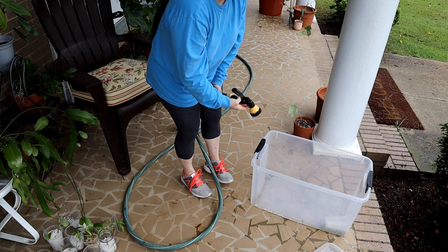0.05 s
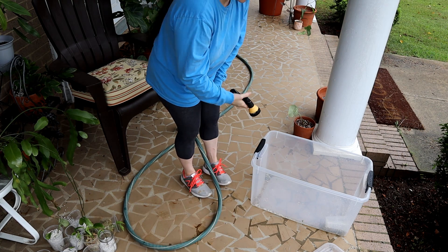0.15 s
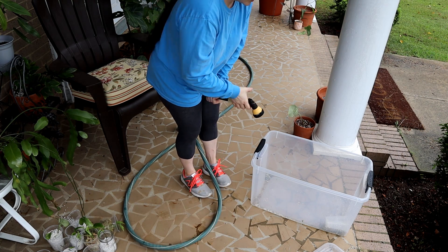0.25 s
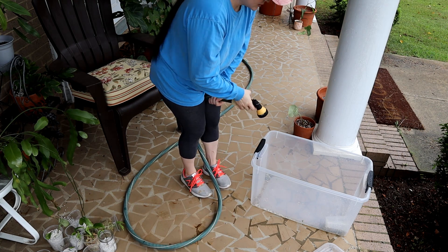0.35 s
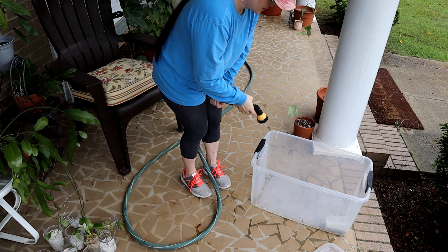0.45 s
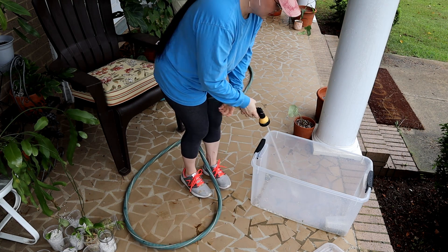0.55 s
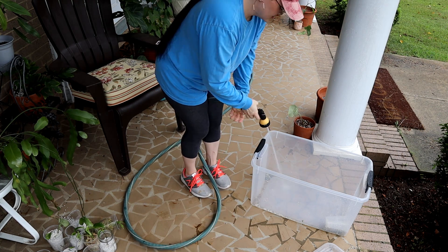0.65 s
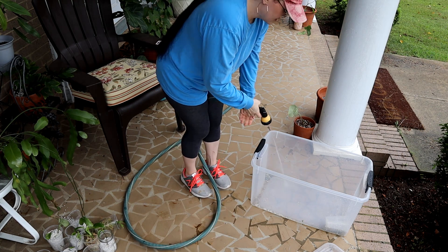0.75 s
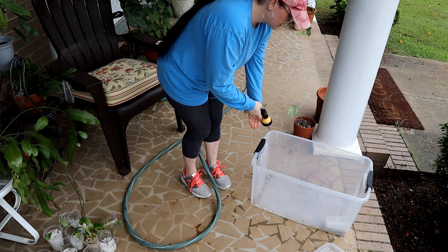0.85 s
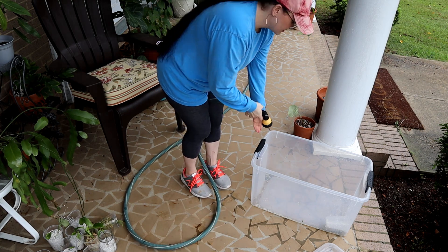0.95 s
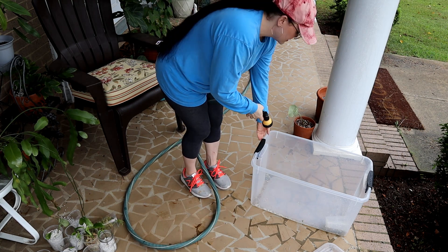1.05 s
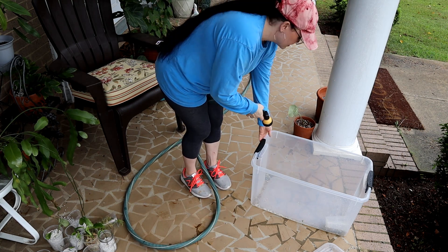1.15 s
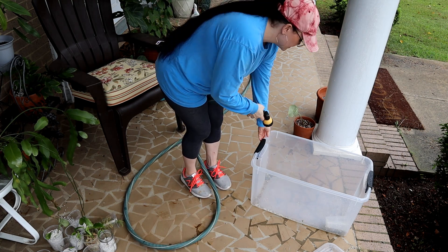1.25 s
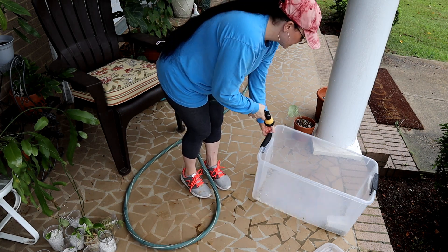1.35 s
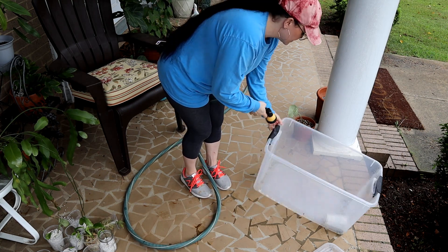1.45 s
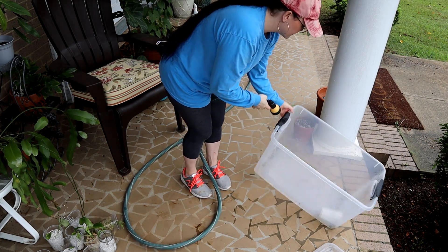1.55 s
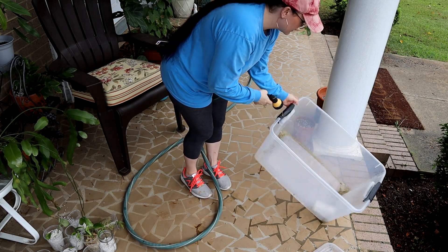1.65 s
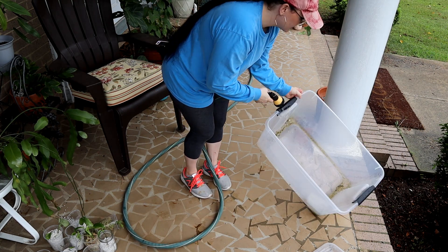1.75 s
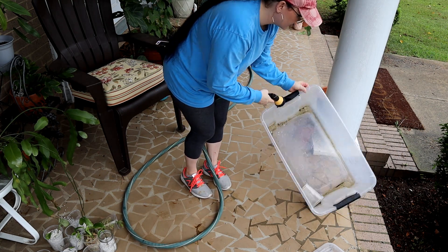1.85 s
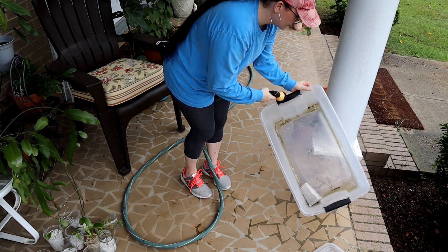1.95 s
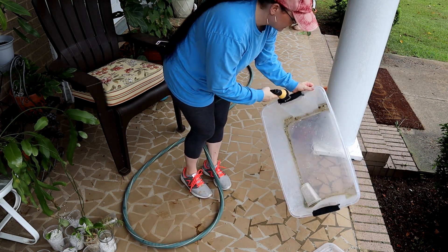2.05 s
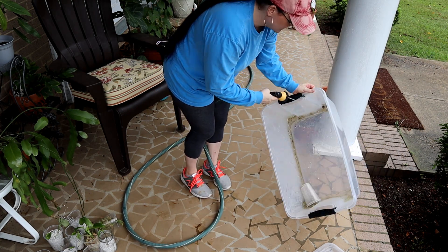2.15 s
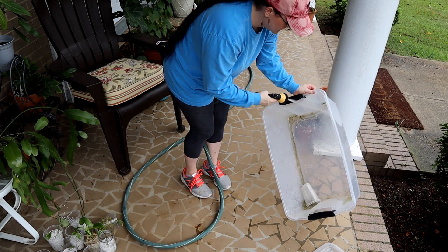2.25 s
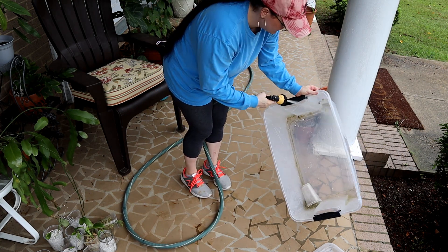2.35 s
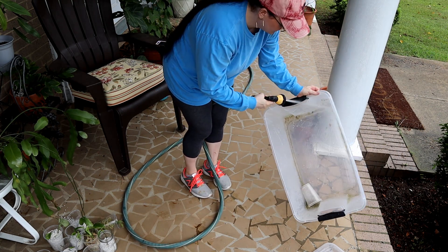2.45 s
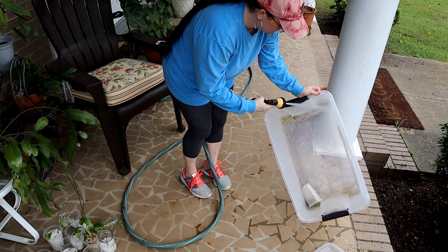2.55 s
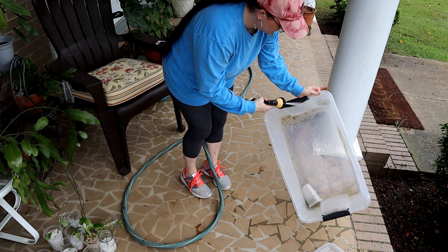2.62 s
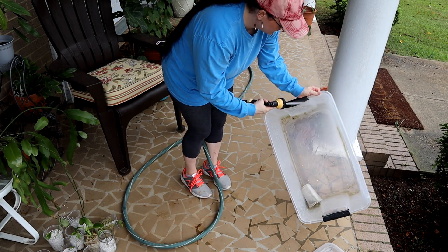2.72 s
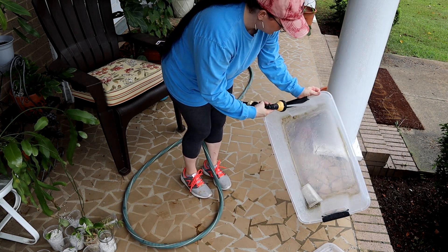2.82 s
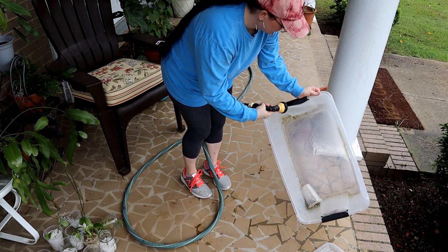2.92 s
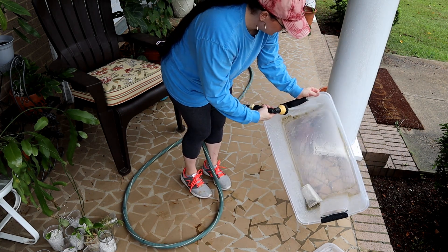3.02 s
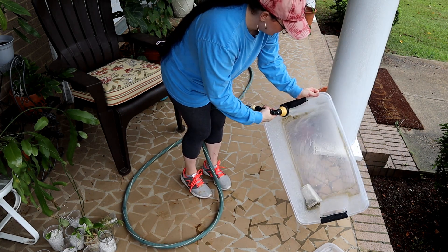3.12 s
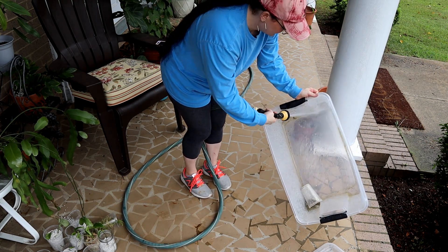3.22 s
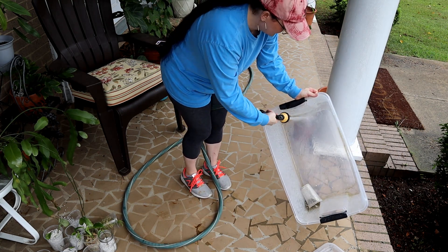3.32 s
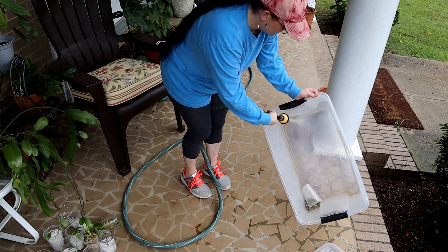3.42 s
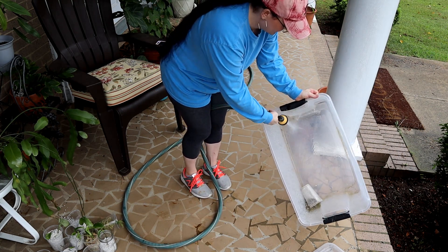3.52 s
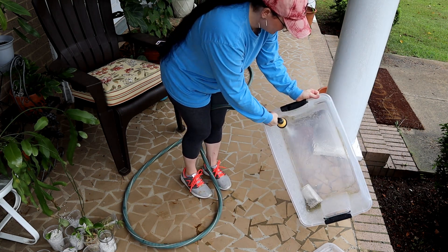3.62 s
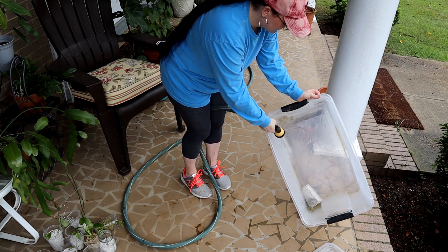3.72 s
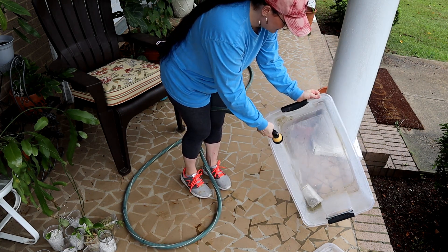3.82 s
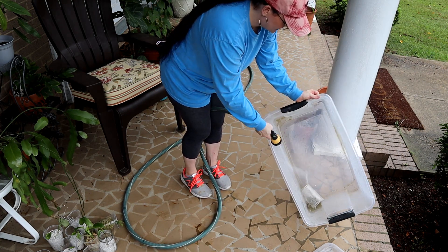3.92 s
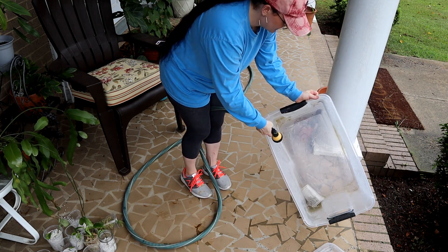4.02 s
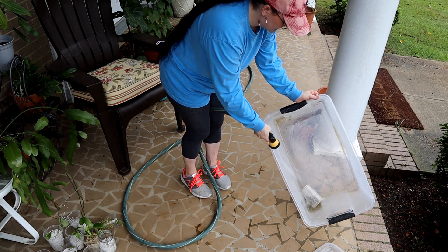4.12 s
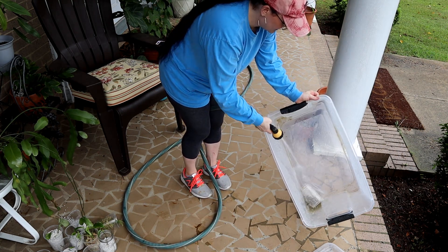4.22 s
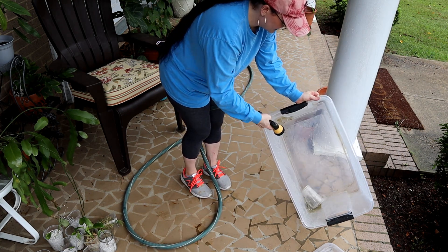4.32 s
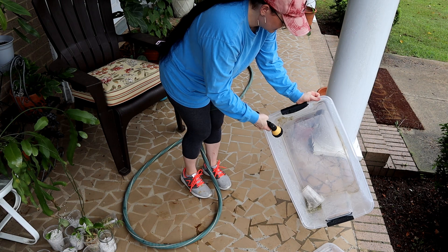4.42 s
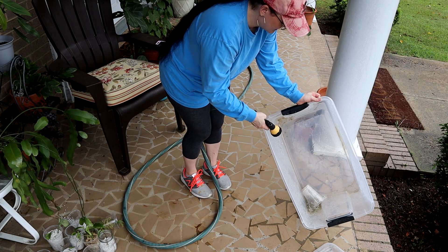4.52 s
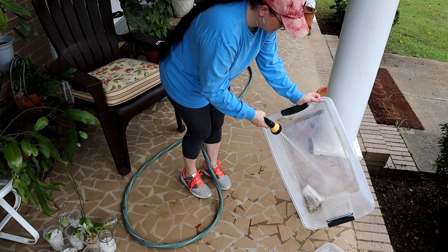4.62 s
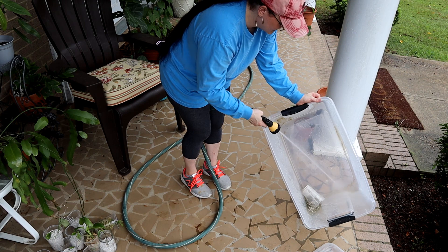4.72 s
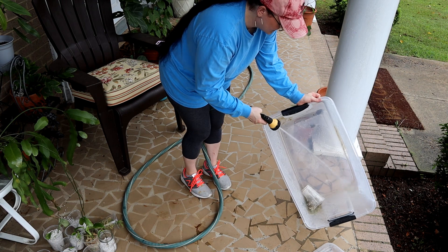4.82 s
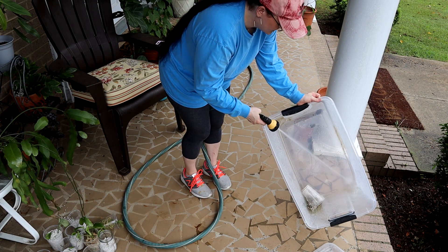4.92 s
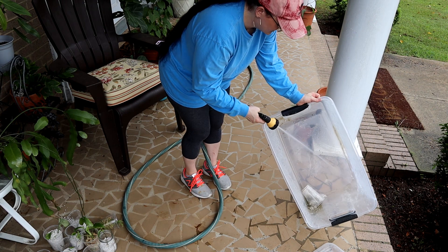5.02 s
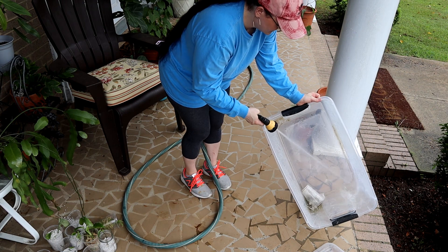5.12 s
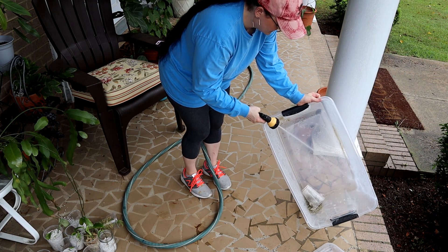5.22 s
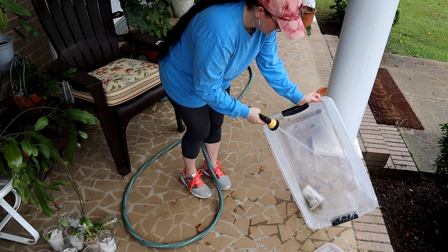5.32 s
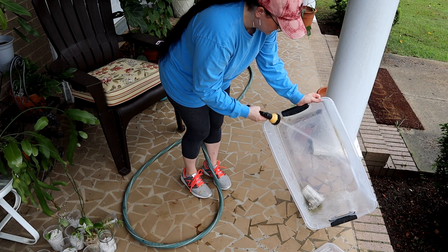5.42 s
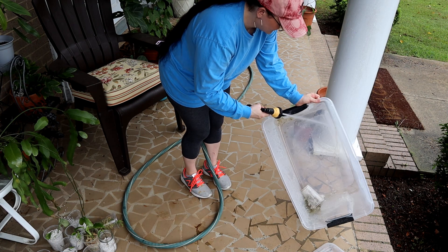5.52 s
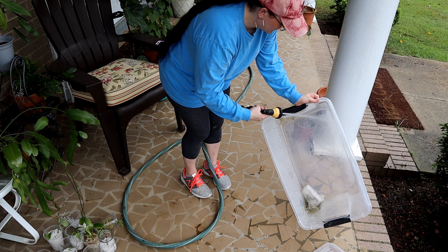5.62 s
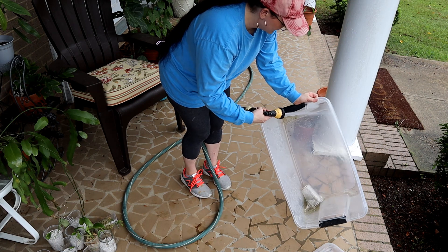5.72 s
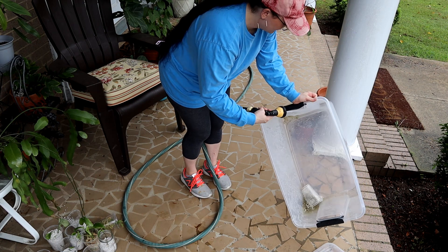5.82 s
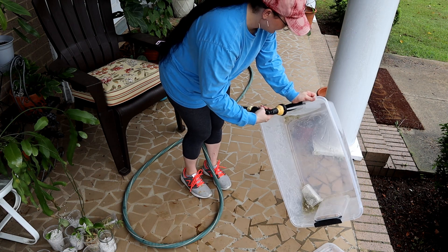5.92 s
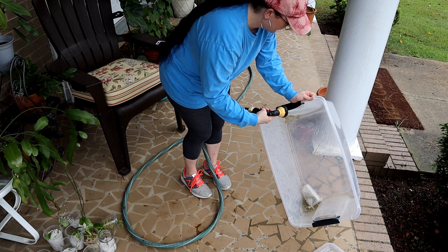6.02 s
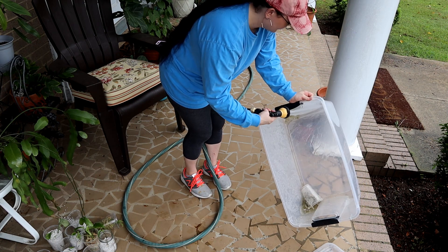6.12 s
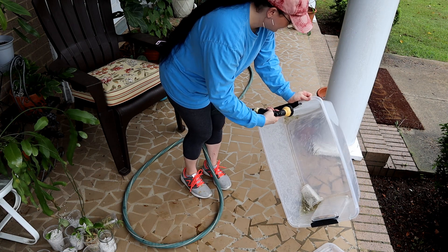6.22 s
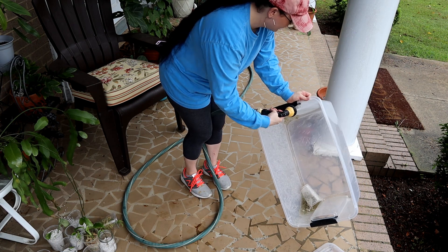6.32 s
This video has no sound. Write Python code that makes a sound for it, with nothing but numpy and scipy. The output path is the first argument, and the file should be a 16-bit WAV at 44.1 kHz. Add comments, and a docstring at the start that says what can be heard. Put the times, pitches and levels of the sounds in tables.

```python
"""The main source is the jet of a garden hose, breaking into drops inside a plastic tote on a covered porch.
Random impacts excite the tote's resonances: floor drumming, wall rattle, splash in pooled water and mist.
After a first squirt the tote is tipped, scraping and booming on the tiles; two long sprays then rinse it.
Decaying noise makes clicks, slaps and knocks; sines make booms and drips; filtered noise is the garden.
The sound is close, with a short answer from the porch roof, and the same in both channels."""
import sys
import numpy as np
from scipy import signal
from scipy.fft import rfft, irfft, next_fast_len
from scipy.io import wavfile
from scipy.ndimage import uniform_filter1d, map_coordinates

SR = 44100
rng = np.random.default_rng(int(sys.argv[2]) if len(sys.argv) > 2 else 0)


def unload_wav(signal):
    """Save mono or channel-first audio to the path in sys.argv[1] as 16-bit WAV at rate SR, clipped to [-1, 1]."""
    wavfile.write(
        sys.argv[1],
        SR,
        np.round(np.clip(np.atleast_2d(signal).T, -1, 1) * 32767).astype(np.int16),
    )


N = 280917
TIME = np.arange(N) / SR  # s
SIZE = next_fast_len(N + SR)  # transform length, padded by a second or more
HZ = np.fft.rfftfreq(SIZE, 1 / SR)

# the tote's rim knocks on the tiles: [t/s, reference level/dB]
KNOCKS = [(1.322, -19), (1.3974, -16), (1.4667, -18), (1.5282, -10.5), (1.5367, -9.5), (1.567, -16),
          (1.589, -7.5), (1.6746, -22), (1.6894, -13), (1.72, -14.5), (1.7594, -5.5), (1.8805, -15.5),
          (1.918, -19)]
# clicks of the nozzle, the handle and big drops, and a short slap of the jet at 3.367 s: [t/s, level/dB]
CLICKS = [(0.111, -40), (0.2567, -32), (0.3433, -39), (0.434, -41), (0.865, -23), (1.2465, -28),
          (1.857, -38), (2.172, -29), (2.284, -35), (3.367, -16), (5.152, -15), (5.227, -11)]
# drips into the pooled water: [t/s, level/dB, starting f/Hz]
DRIPS = [(2.041, -31, 2120), (2.107, -24, 1120), (2.147, -24.5, 1540), (2.208, -29, 2570),
         (2.243, -23, 2640)]
# the edge drags over the tiles until about 2 s, then a little water trickles in the tote:
# [t/s, driving level/dB (the pressure, while it drags)]
DRAG_AND_TRICKLE = [(1.33, -34.5), (1.49, -31.5), (1.57, -27), (1.87, -27), (1.98, -49), (2.29, -42.5)]
# the panels flex and boom as the tote is tipped: [t/s, level/dB]
FLEXES = [(1.3245, -38), (1.429, -38), (1.5288, -26.5), (1.679, -21), (1.7592, -15.5), (1.7979, -14.5),
          (1.8814, -17), (1.917, -19)]
# the jet rings ribs, corners and panels; the 103 Hz row is the low thud of its third arrival:
# [t/s, level/dB, f/Hz, swell length/s]
RIB_CROSSINGS = [(0.737, -19, 1900, 0.053), (0.78, -23, 2600, 0.025), (2.342, -29, 4900, 0.024),
                 (2.347, -16, 1250, 0.024), (2.905, -23.5, 583, 0.23), (3.228, -14, 3370, 0.014),
                 (3.233, -13.5, 2200, 0.02), (3.238, -10.5, 1270, 0.014), (3.444, -23, 404, 0.045),
                 (3.659, -26.5, 850, 0.15), (4.696, -26, 103, 0.016), (4.715, -13, 1200, 0.018),
                 (5.024, -18, 2280, 0.0092), (5.029, -8.5, 1400, 0.0091), (5.073, -13.5, 3390, 0.012),
                 (5.078, -16.5, 5360, 0.013), (5.115, -11.5, 1270, 0.01), (5.256, -23, 5700, 0.04),
                 (5.793, -29.5, 1400, 0.088)]
# squeezes of the nozzle: [jet arrives t/s, valve shuts t/s, first slap level/dB, its thud level/dB,
# base mist level at the start/dB, base mist level at the end/dB]
SQUEEZES = [(0.579, 0.819, -2.5, -10.5, -24.5, -29), (2.293, 4.358, -14, -9, -27, -26),
            (4.6718, 6.37, -21, -7.5, -25.5, -29)]
# the hand's path, one table a squeeze: [t/s, force level on the plastic/dB, aim from -1 side wall to 1 floor]
HAND_PATHS = [
    [(0.58, -16, 0.1), (0.63, -14, 0.12), (0.72, -20.5, -0.038), (0.81, -20.5, -0.12)],
    [(2.33, -15.5, -0.04), (2.46, -21.5, 0.056), (2.58, -20.5, 0.57), (2.72, -20, 0.22), (2.95, -20.5, 0.5),
     (3.18, -26, -0.36), (3.32, -19.5, -0.097), (3.42, -19.5, -0.27), (3.62, -18, -0.11),
     (3.83, -24.5, -0.88), (3.98, -31, 0.19), (4.26, -36, 0.4)],
    [(4.68, -19, 0.024), (4.9, -17.5, 0.24), (4.96, -16, 0.46), (5.02, -23.5, -0.75), (5.17, -27, -0.31),
     (5.23, -25.5, -1.1), (5.3, -22, -0.64), (5.35, -27.5, 0.36), (5.44, -22, 0.28), (5.6, -30, 0.38),
     (5.78, -28.5, 0.3), (5.9, -25.5, 0.65), (6.06, -37, -0.37), (6.17, -24, 0.77), (6.37, -37, -0.58)],
]
# quick swings over the near wall, throwing up mist: [t/s, swell length/s, force level/dB, mist level/dB]
SWINGS = [(3.21, 0.0095, -36, -24), (3.883, 0.024, -37, -19), (4.069, 0.027, -24.5, -18.5),
          (4.135, 0.017, -23, -18.5), (4.304, 0.0093, -28, -21.5), (4.334, 0.02, -17.5, -29),
          (5.167, 0.016, -44, -27.5), (5.5, 0.011, -45, -32)]
# the jet crosses the slack middle of the floor, which rumbles: [t/s, swell length/s, level/dB]
RUMBLES = [(0.76, 0.026, -35), (2.326, 0.02, -22), (2.467, 0.015, -31), (2.66, 0.04, -25.5),
           (3.72, 0.04, -37), (4.735, 0.037, -26.5), (4.965, 0.0095, -29), (5.455, 0.04, -37),
           (5.787, 0.075, -31), (6.243, 0.043, -38)]

# resonances of the tilted tote, in three groups: [f/Hz, width/Hz, relative level/dB]
TILTED_DEEP_MODES = [(128, 35, -19), (170, 63, -18), (260.3, 25, -6), (286.4, 12.5, 1.5), (310, 7.7, -15.5)]
TILTED_FLOOR_MODES = [(365.5, 35, -5.5), (424, 60, -4), (520, 37, -1.5), (568.7, 30, 2.5), (602.8, 14, 3),
                      (689, 40, -4), (740, 46, -12.5)]
TILTED_WALL_MODES = [(1063, 66, -4), (1190, 31, 2), (1312, 167, -2.5), (1620, 317, -3), (1814, 320, -2.5),
                     (2300, 490, -6), (2830, 480, -7.5), (3565, 370, -8)]
# resonances while it stands flat on the tiles: [f/Hz, width/Hz, relative level/dB]
STANDING_DEEP_MODES = [(111, 46, -40), (208, 7.5, -2.5), (273, 35, -13), (329, 25, 3)]
STANDING_FLOOR_MODES = [(343, 29, -10), (425, 46, -3.5), (512, 55, 0), (597, 60, -5.5), (750, 43, -4.5)]
STANDING_WALL_MODES = [(1050, 81, -2), (1230, 78, -1.5), (1405, 110, -3), (1680, 32, -2), (1940, 60, -4),
                       (2350, 190, -10), (2645, 52, -6.5), (3050, 140, -12), (3600, 69, -4),
                       (4770, 110, -35)]
# the whole empty tote booms: [f/Hz, relative level/dB, t60 without the hand's damping/s]
BOOM_MODES = [(122, -7, 0.24), (147, -13, 0.17), (171.8, 5.5, 0.41), (245, -5, 0.45), (283, 1, 0.11),
              (410, -13.5, 0.2)]
# a faint ring lingers after the first squirt: [f/Hz, width/Hz, level/dB]
AFTER_RING_MODES = [(1911, 3, -4), (2013, 5, -6), (3666, 7, -20)]

# spectral shapes of the water: [f/Hz, relative level/dB]
SPLASH_SPECTRUM = [(25, -23), (80, -37), (150, -10), (300, -2.5), (450, -2), (800, 4), (1050, 0),
                   (1500, -5), (3000, -18.5), (8000, -48.5)]
PATTER_SPECTRUM = [(1000, -27), (2000, -8), (3400, -0.5), (4200, -0.5), (4800, 2), (5400, 3), (6100, -4.5),
                   (7200, -20), (12000, -6)]
MIST_SPECTRUM = [(1000, -18.5), (3000, -9.5), (5400, 2), (7000, 0.5), (8500, 0), (10500, 2), (13500, 0.5),
                 (15000, -5), (16000, -4)]
# spectral shapes of blows on the plastic: [f/Hz, relative level/dB]
CRACK_SPECTRUM = [(200, -27), (700, -3), (1100, 1.5), (1500, 0), (2500, 1), (4500, -5), (5500, -3),
                  (7200, -14.5), (15000, -16.5)]
CLACK_SPECTRUM = [(150, -13), (450, -10), (610, 5), (700, -6), (820, -12), (1070, -3.5), (1400, -4.5),
                  (4000, -63)]
TICK_SPECTRUM = [(80, -19), (300, 6), (1500, 3), (2400, 4), (5000, 7), (7000, 0.5), (15000, -7)]
THUD_SPECTRUM = [(30, -36), (70, -20), (110, -10), (200, -7), (300, 0), (600, -4), (1200, -8), (4000, -32)]
# spectral shapes of sand under the rim and of the outdoor background: [f/Hz, relative level/dB]
GRIT_SPECTRUM = [(410, -38), (700, -9), (1070, -4), (1480, -3), (1690, -8), (3540, -6), (7600, -18),
                 (13600, -24.5), (15500, -36)]
GARDEN_SPECTRUM = [(15, -41), (25, -22.5), (64, -10), (96, -10.5), (144, -6.5), (261, -11.5), (425, -10),
                   (905, -12), (1470, -11), (2970, -17), (3680, -11), (3990, -16), (8490, -25.5),
                   (11700, -28.5), (15800, -30)]
# reverberation time of the porch: [f/Hz, t60/s]
PORCH_DECAY = [(150, 0.25), (1000, 0.32), (4000, 0.2), (14000, 0.071)]

TIPPED_S = 1.5  # the moment at which the floor tips up, its rim still on the tiles
TOP_HZ = 15850  # upper band limit
# pressure stored in the hose gives each squeeze a surge; at shut-off the mist dies before the drumming
SURGE_DB, SURGE_S, RELEASE_DB_PER_S, MIST_RELEASE_DB_PER_S = 2, 0.1, 145, 219
# the valve spits, ever louder, just before the jet arrives
SPIT_DB, SPIT_RISE_DB_PER_S = -35.5, 280
# how the parts answer the jet: (dB above its force, dB more per unit of aim towards the floor)
FLOOR_GAIN, DEEP_GAIN, SPLASH_GAIN, WALL_GAIN = (-5, 8.8), (-14, 1), (-2.5, -1.5), (-1.22, -8)
SWING_AIM = -0.4  # -1 side wall to 1 floor
# mist rises by a share of the force above a usual force, and as the jet glances off the wall (dB per unit aim)
MIST_SHARE, USUAL_FORCE_DB, GLANCE_DB = 0.38, -20.5, 1.5
CLACK_DB = -7.5  # the hollow clack of each knock, relative to the knock's reference level
GRIT_DB, GRIT_SHARE = -28.5, 0.28  # the grit follows only a share of the driving level
HAND_DAMPING_DB_PER_S = 128  # the hand on the rim shortens each boom


def amp(db):
    """Logarithmic level: decibels to amplitude gain."""
    return 10 ** (np.asarray(db) / 20)


def unit(x):
    """Normalisation: scale to rms 1."""
    return x / np.sqrt(np.mean(x ** 2) + 1e-20)


def along(points, hz):
    """Logarithmic frequency scale: read (f/Hz, value) points between their knots."""
    f, values = np.transpose(points)
    return np.interp(np.log(hz + 1), np.log(f), values)


def curves(rows):
    """Level against time: one dB curve for each column, at -120 dB outside the table."""
    s, *columns = np.transpose(rows)
    return [np.interp(TIME, s, c, left=-120, right=-120) for c in columns]


def wobble(rate):
    """Slow random modulation: a smooth curve through `rate` random knots a second."""
    knots = rng.standard_normal(int(N * rate / SR) + 4)
    coarse_time = TIME[::32]
    return np.interp(TIME, coarse_time, map_coordinates(knots, [coarse_time * rate]))


def swell(s, length, db):
    """Gaussian envelope: level rises and falls as the jet passes a spot."""
    return amp(db) * np.exp(-.5 * ((TIME - s) / length) ** 2)


def filtered(x, response):
    """Linear filtering: multiply the spectrum of x by a frequency response."""
    return irfft(rfft(x, SIZE) * response, SIZE)[:N]


def unit_gain(response):
    """Noise gain: the rms gain of a response for white noise."""
    return np.sqrt(np.mean(np.abs(response) ** 2))


def colour(points):
    """Minimum phase: fold the cepstrum to get the causal response with this spectrum."""
    cepstrum = irfft(np.log(amp(along(points, HZ))), SIZE)
    cepstrum[1:SIZE // 2] *= 2
    cepstrum[SIZE // 2 + 1:] = 0
    return np.exp(rfft(cepstrum))


def body(modes):
    """Modal superposition: resonances of alternating sign, each falling steeply below its centre."""
    response = 0
    for k, (centre, width, db) in enumerate(modes):
        resonance = 1j * HZ * width / (centre * centre - HZ ** 2 + 1j * HZ * width)
        high_pass = 1j * HZ / (centre / 2 + 1j * HZ)
        response = response + (-1) ** k * amp(db) * resonance * high_pass
    return response


def impacts(rate, scatter_db):
    """Poisson-like arrivals: tiny impacts at random moments, with clipped log-normal sizes."""
    hit = rng.random(N) < rate / SR
    size_db = scatter_db * np.clip(rng.standard_normal(N), -2.5, 2.5)
    return hit * rng.choice([-1, 1], N) * amp(size_db)


def shower(level, response, rate, scatter_db):
    """Forced vibration: a hail of impacts at the given level excites a body."""
    return filtered(level * unit(impacts(rate, scatter_db)), response / unit_gain(response))


def add(track, s, sound):
    """Superposition: mix a sound into the track at s seconds."""
    part = track[round(s * SR):][:len(sound)]
    part += sound[:len(part)]


def bursts(times, levels_db, t60, rises):
    """Exponential decay: a short dying burst of noise at each time."""
    envelope = np.zeros(N)
    t = np.arange(SR // 4) / SR
    for s, db, life, rise in np.broadcast(times, levels_db, t60, rises):
        add(envelope, s, amp(db - 60 * t / life) * (1 - np.exp(-t / rise)))
    return envelope * rng.standard_normal(N)


def struck(times, levels_db, spectrum, t60, rises=0.00013):
    """Impact excitation: dying noise bursts coloured by the struck body."""
    response = colour(spectrum)
    return filtered(bursts(times, levels_db, t60, rises), response / unit_gain(response))


def garden():
    """Stationary noise: the outdoor background, with a slight wobble of level."""
    background = unit(filtered(rng.standard_normal(N), colour(GARDEN_SPECTRUM)))
    return amp(-47.5 + 0.31 * wobble(23.0)) * background


def clicks():
    """Brief impact: plastic parts tick under hands and big drops, and the jet gives one short slap."""
    s, level_db = np.transpose(CLICKS)
    return struck(s, level_db, TICK_SPECTRUM, t60=0.044)


def porch(x, delay=.006, count=20):
    """Reverberation: roof, wall and tiles answer as decaying noise, and the treble dies first."""
    hz, t, z = signal.stft(rng.standard_normal((count, SR // 2)), SR, nperseg=256)
    decay = amp(-60 * t / along(PORCH_DECAY, hz)[:, None])
    tails = signal.istft(z * decay, SR, nperseg=256)[1]
    out = np.zeros(N)
    # each span of the sound gets a fresh echo tail, so no random pitch stands out
    for span, tail in zip(np.array_split(np.arange(N), count), tails):
        add(out, span[0] / SR + delay, signal.fftconvolve(x[span], tail / np.linalg.norm(tail)))
    return out


def valve():
    """Turbulent release: the nozzle spits ever louder as the trigger is pressed."""
    level = np.zeros(N)
    for arrival in np.transpose(SQUEEZES)[0]:
        level += (TIME < arrival) * amp(SPIT_DB - SPIT_RISE_DB_PER_S * np.abs(arrival - TIME))
    return shower(level, colour(TICK_SPECTRUM), rate=5100, scatter_db=7)


def slaps():
    """Liquid impact: the jet's leading slug hits the plastic with a slap and a thud."""
    s, _, slap_db, thud_db, _, _ = np.transpose(SQUEEZES)
    return struck(s, slap_db, TICK_SPECTRUM, t60=0.011) + struck(s, thud_db, THUD_SPECTRUM, t60=0.058)


def answer(force_db, aim):
    """Modal participation: aim sets how far floor, deep modes, splash and wall respond to the force."""
    gains = (FLOOR_GAIN, DEEP_GAIN, SPLASH_GAIN, WALL_GAIN)
    return np.array([amp(force_db + db + lean_db * aim) for db, lean_db in gains])


def jet():
    """Stored pressure: each squeeze surges, holds and dies, shared by aim among tote parts and mist."""
    parts, mist = np.zeros((4, N)), np.zeros(N)
    for (start, shut, _, _, first_db, last_db), path in zip(SQUEEZES, HAND_PATHS):
        s, *columns = np.transpose(path)
        force_db, aim = [np.interp(TIME, s, c) for c in columns]
        running = TIME >= start
        since_shut = np.maximum(TIME - shut, 0)
        surge_db = SURGE_DB * np.exp(-np.abs(TIME - start) / SURGE_S)
        parts += running * answer(force_db + surge_db - RELEASE_DB_PER_S * since_shut, aim)
        mist_db = np.interp(TIME, [start, shut], [first_db, last_db])
        mist_db += MIST_SHARE * (force_db - USUAL_FORCE_DB) - GLANCE_DB * aim
        mist += running * amp(mist_db + surge_db - MIST_RELEASE_DB_PER_S * since_shut)
    for s, length, force_db, mist_db in SWINGS:
        parts += np.outer(answer(force_db, SWING_AIM), swell(s, length, 0))
        mist += swell(s, length, mist_db)
    return (*parts, mist)


def wandering(x, depth_db, size=5):
    """Position-dependent excitation: as the point of impact moves, each resonance is favoured in turn."""
    z = signal.stft(x, nperseg=1024)[2]
    field = rng.standard_normal(z.shape)
    for axis in (0, 1):  # smooth over frequency, then time
        field = uniform_filter1d(field, size, axis)
    gain = unit(amp(depth_db * unit(field)))
    return signal.istft(z * gain, nperseg=1024)[1][:N]


def panel(level, standing_modes, tilted_modes, rate, scatter_db):
    """Boundary condition: tipping the floor up changes the resonances."""
    tilted = TIME > TIPPED_S
    standing_sound = shower(level * ~tilted, body(standing_modes), rate, scatter_db)
    tilted_sound = shower(level * tilted, body(tilted_modes), rate, scatter_db)
    return standing_sound + tilted_sound


def spray(clump_db=1.1, flutter_db=1.5):
    """Jet break-up: drops excite whichever part of the tote they are aimed at."""
    floor, deep, splash, wall, mist = jet()
    deep = deep + sum(swell(*row) for row in RUMBLES)
    clumps = unit(amp(clump_db * wobble(140)))  # the water arrives in uneven slugs
    flutter = amp(flutter_db * wobble(30))
    rumble = panel(deep, STANDING_DEEP_MODES, TILTED_DEEP_MODES, rate=1500, scatter_db=0.0)
    drum = panel(floor * clumps * flutter, STANDING_FLOOR_MODES, TILTED_FLOOR_MODES, rate=1500, scatter_db=1.0)
    rattle = panel(wall * clumps, STANDING_WALL_MODES, TILTED_WALL_MODES, rate=3000, scatter_db=2.0)
    slosh = shower(splash * clumps, colour(SPLASH_SPECTRUM), rate=2200, scatter_db=3)
    # the drops' own sharp ticks grow both with the blow on the wall and with the amount of mist
    patter_level = np.sqrt(wall * mist) * clumps * amp(-0.9)
    patter = shower(patter_level, colour(PATTER_SPECTRUM), rate=4000, scatter_db=1.0)
    hiss_level = mist * np.sqrt(clumps) * amp(-0.5)
    hiss = shower(hiss_level, colour(MIST_SPECTRUM), rate=12000, scatter_db=6.5)
    return rumble + drum + wandering(rattle + slosh + patter, depth_db=2.1) + hiss


def after_ring(water):
    """Lightly damped resonance: narrow modes store the first squirt and ring on faintly."""
    return filtered(water * (TIME < TIPPED_S), body(AFTER_RING_MODES))


def ribs(relative_width=0.13):
    """Local resonance: each sound of the jet on a rib, corner or panel swells and fades in one broad mode."""
    out = np.zeros(N)
    for s, db, hz, length in RIB_CROSSINGS:
        resonance = body([(hz, relative_width * hz, 0)])
        out += shower(swell(s, length, db), resonance, rate=5000, scatter_db=3)
    return out


def boom(times, levels_db):
    """Free vibration: each blow rings the tote's low modes at new strengths, damped by the hand."""
    out, t = np.zeros(N), np.arange(SR // 2) / SR
    for s, db in zip(times, levels_db):
        ring = np.zeros(len(t))
        for hz, level_db, t60 in BOOM_MODES:
            mode_db = level_db + rng.normal(0, 1.2) - 60 * t / t60
            ring += amp(mode_db) * np.sin(2 * np.pi * (hz * t + rng.random()))
        add(out, s, amp(db - HAND_DAMPING_DB_PER_S * t) * ring * (1 - np.exp(-t / 0.004)))
    return out


def tipping(sharp_db=-9, softening=0.055):
    """Stick-slip friction and impact: the rim grates, catches and booms; a faint trickle of water follows."""
    s, knock_db = np.transpose(KNOCKS)
    softness = np.exp(np.clip(softening * (sharp_db - knock_db), 0, 2))  # hard blows snap, light ones scuff
    cracks = struck(s, knock_db + 1.5, CRACK_SPECTRUM, t60=0.023 * softness, rises=0.0023 * softness ** 2)
    clacks = struck(s, knock_db + CLACK_DB, CLACK_SPECTRUM, t60=0.06, rises=0.0011 * softness)
    drive_db, = curves(DRAG_AND_TRICKLE)
    # the same random impacts on the tote's modes serve for the drag and then the trickle
    shudder = shower(amp(drive_db - 7.0), body(TILTED_FLOOR_MODES), rate=360, scatter_db=4.5)
    boom_widths = [(hz, 3 / t60, db) for hz, db, t60 in BOOM_MODES]
    shudder += shower(amp(drive_db - 6.5), body(boom_widths), rate=270, scatter_db=3.0)
    # the rim grips and lets go, crushing single grains of sand
    catches = unit(amp(2.3 * wobble(50)))
    grit = shower(catches, colour(GRIT_SPECTRUM), rate=1600, scatter_db=4.5)
    active = (TIME > DRAG_AND_TRICKLE[0][0]) & (TIME < DRAG_AND_TRICKLE[-1][0])
    fine_crackle = active * amp(GRIT_DB + GRIT_SHARE * drive_db) * grit
    return cracks + clacks + boom(*np.transpose(FLEXES)) + shudder + fine_crackle


def drips(t60=0.035, rise=1.4):
    """Bubble resonance: each drip traps a bubble whose pitch climbs, by `rise` per second, as it dies."""
    out, t = np.zeros(N), np.arange(SR // 10) / SR
    for s, db, hz in DRIPS:
        envelope = amp(db - 60 * t / t60) * (1 - np.exp(-t / 0.00079))
        add(out, s, envelope * np.sin(2 * np.pi * hz * t * (1 + rise * t / 2)))
    return out


def scene():
    """Superposition: all sources on the porch, the same in both channels."""
    water = spray() + ribs() + slaps()
    near = water + valve() + tipping() + clicks() + drips()
    mono = near + amp(-11.0) * porch(near) + after_ring(water) + garden()
    return np.array([mono, mono])


def record(dry, ceiling=1.1):
    """Saturation and band limiting: round off the highest peaks, keep nothing above TOP_HZ."""
    rounded = dry / (1 + np.abs(dry / ceiling) ** 6) ** (1 / 6)
    return np.array([filtered(channel, HZ < TOP_HZ) for channel in rounded])


dry = scene()
out = record(dry)
unload_wav(out)
```